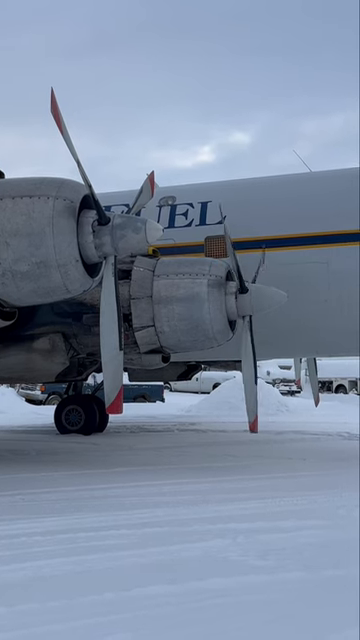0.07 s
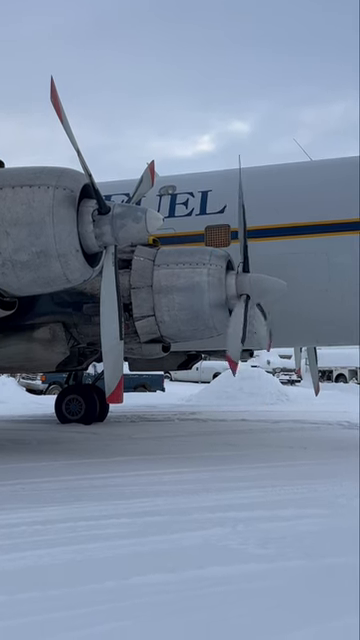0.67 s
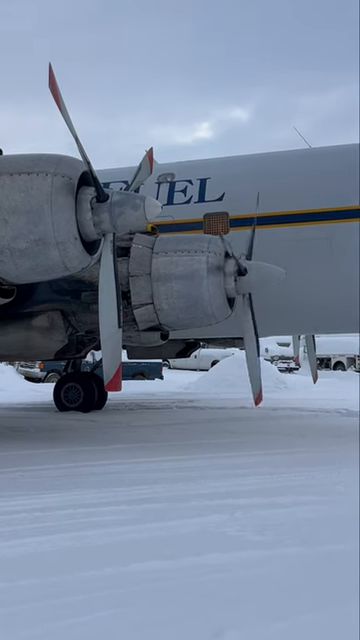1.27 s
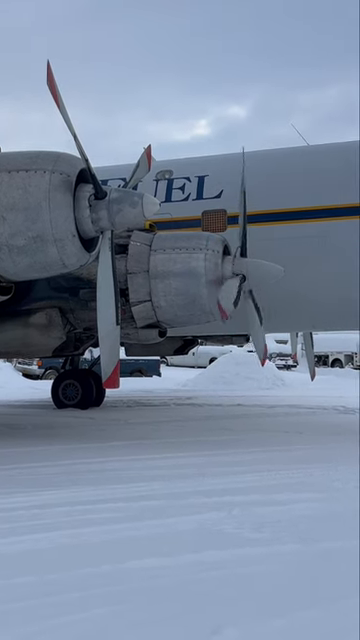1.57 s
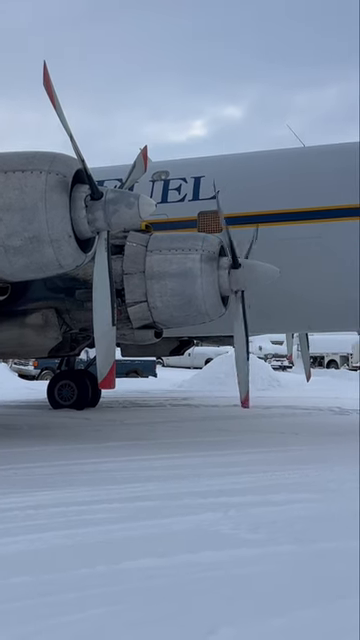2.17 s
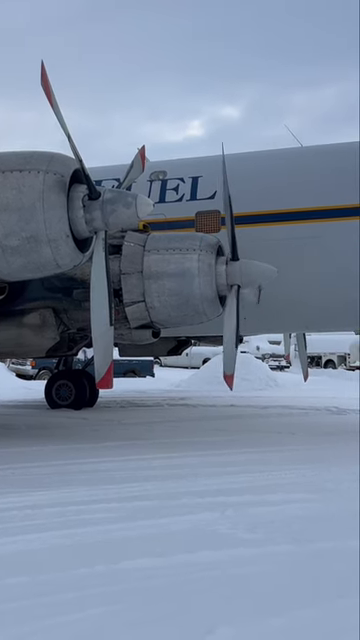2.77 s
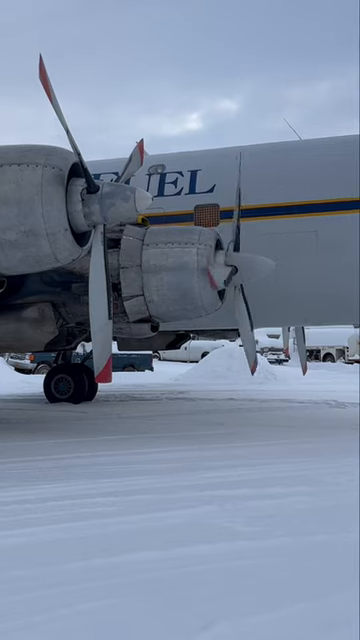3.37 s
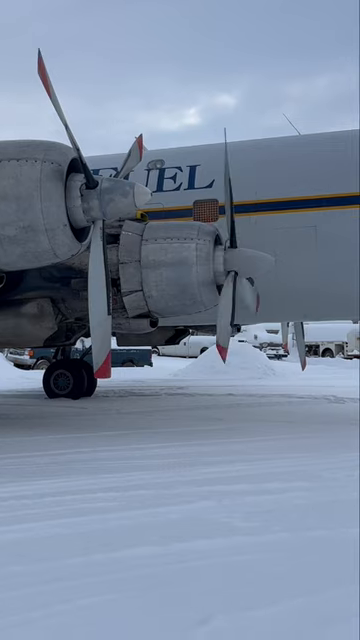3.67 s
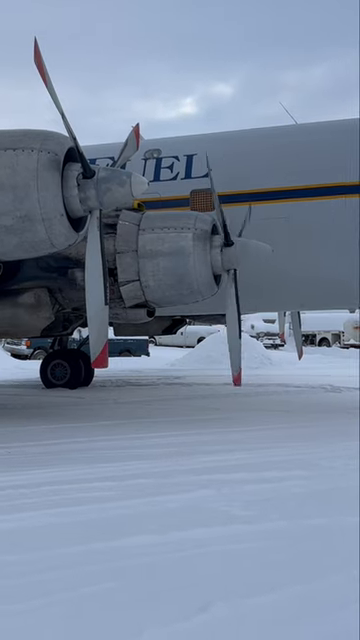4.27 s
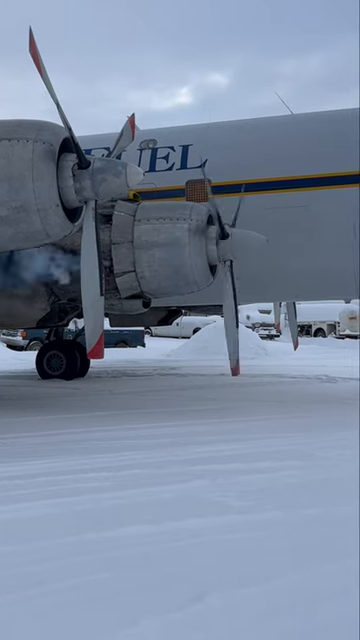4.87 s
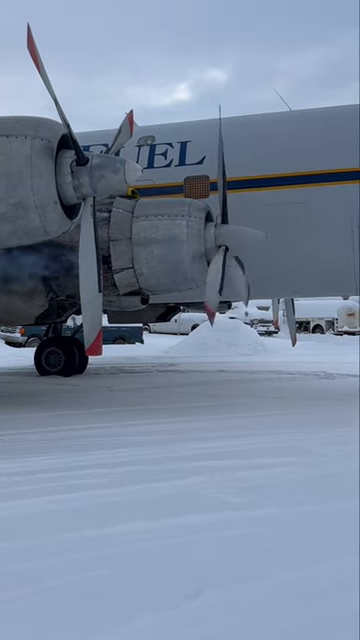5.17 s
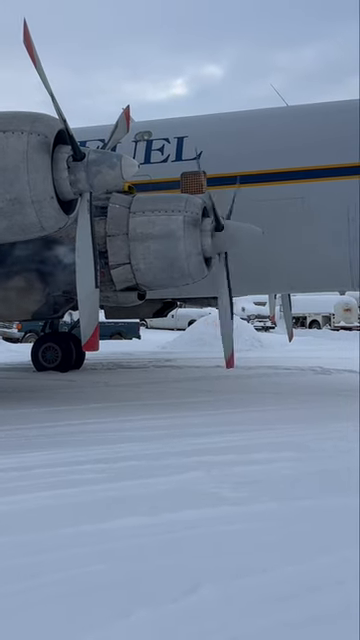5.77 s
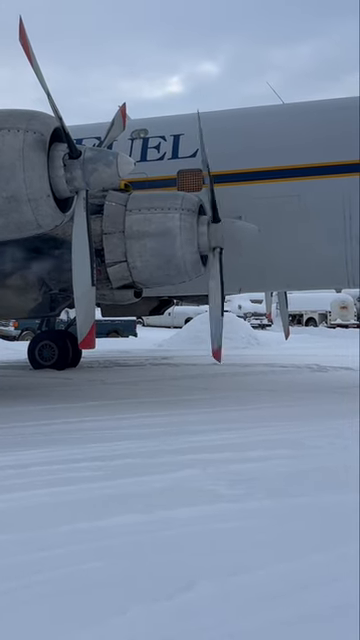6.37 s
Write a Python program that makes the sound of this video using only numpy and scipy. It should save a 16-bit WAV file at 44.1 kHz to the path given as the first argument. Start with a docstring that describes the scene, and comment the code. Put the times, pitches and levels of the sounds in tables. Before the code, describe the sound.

From beside the wing on an open airfield, loose gears clank softly and a starter sings faintly while a big propeller engine turns over. Scattered pops and coughs build into a short, loud run of cracking, booming exhaust bangs. Afterwards the engine rumbles and clatters, gradually slowing, with a sinking whine and a few knocks. The sound sits slightly to one side, with a short echo and faint hiss.

```python
"""Slack gears clank and a starter sings thinly as a big radial aircraft engine is cranked on a snowy apron.
Single cylinders cough into the exhaust stacks, then a volley of bangs spins the shaft up.
The engine coasts on: exhaust strokes rumble in the pipes, valves clatter, the gear whine falls.
Heard in stereo from the ground beside the wing, with a short echo off the airframe and a faint hiss."""
import sys
import numpy as np
from scipy import signal
from scipy.fft import rfft, irfft, next_fast_len
from scipy.io import wavfile
from scipy.ndimage import map_coordinates

SR = 44100
rng = np.random.default_rng(int(sys.argv[2]) if len(sys.argv) > 2 else 0)


def dump(signal):
    """Clip the signal to [-1, 1] and save it as 16-bit WAV at the path in sys.argv[1]."""
    limited = np.clip(np.atleast_2d(signal).T, -1, 1)
    pcm = np.round(limited * 32767).astype(np.int16)
    wavfile.write(sys.argv[1], SR, pcm)


N = 292383

# cylinders firing into the stacks:
# (time [s], crack [dB], bark [dB], blast [dB], boom [dB], stack resonance [Hz], rise [s])
FIRINGS = [(2.529, -40.5, -48, -42.5, -46.5, 2980, 0.0088),
           (2.545, -32.5, -35.5, -32.5, -35.5, 2070, 0.007), (3.092, -72, -36, -30.5, -26.5, 3900, 0.021),
           (3.227, -55.5, -37.5, -35, -24.5, 2486, 0.011), (3.654, -82, -35, -32.5, -34.5, 3860, 0.019),
           (3.856, -51, -55, -43.5, -39, 5370, 0.0094), (3.884, -30.5, -27, -28.5, -23, 2420, 0.014),
           (4.016, -44, -40, -40, -42, 2860, 0.011), (4.043, -32.5, -40, -39.5, -38, 2620, 0.015),
           (4.153, -46.5, -50, -36.5, -44, 2820, 0.0085), (4.175, -30.5, -34, -57, -32, 2420, 0.014),
           (4.272, -11, -29.5, -36, -48, 4000, 0.015), (4.329, -27, -40.5, -30, -38, 2670, 0.012),
           (4.401, -23.5, -30.5, -26, -17.5, 1660, 0.016), (4.467, -15.5, -21, -24, -16, 1671, 0.014),
           (4.541, -15, -14, -26.5, -25, 6430, 0.012), (4.587, -15, -13.5, -28, -15.5, 2050, 0.018),
           (4.622, -18.5, -14.5, -19, -22, 6300, 0.021), (4.659, -10.5, -20, -32, -34, 1590, 0.0089),
           (4.701, -15, -18.5, -20, -31, 2740, 0.011), (4.75, -13, -14.5, -37, -24, 6840, 0.012),
           (4.789, -18.5, -10.5, -20, -9.5, 1990, 0.016), (4.815, -25, -15.5, -28.5, -15, 2800, 0.011),
           (4.85, -17.5, -23, -25.5, -31, 2580, 0.011), (4.886, -13.5, -15.5, -23, -42, 2820, 0.01),
           (4.931, -14.5, -16, -24, -16, 4070, 0.01), (5.024, -16, -22, -27.5, -21, 2914, .012)]
# spectrum of gas cracking out of a stack: (frequency [Hz], level [dB])
CRACK_SPECTRUM = [(1300, -8.5), (1750, 0), (2100, 2.5), (2350, -5), (2800, 4.5), (3300, -2.5), (4000, 3),
                  (5300, -3), (6500, -2), (7500, -16), (9900, -13.5), (11900, -10), (13900, -19.5),
                  (15500, -7)]
# spectrum of the cowling's clank: (frequency [Hz], level [dB])
CLANK_SPECTRUM = [(450, -24), (620, 3), (820, 7), (1030, 7.5), (1220, -5.5), (1550, 3.5), (1950, -2),
                  (2500, -42), (3500, -26.5)]
# bright spectrum of ringing metal, and of gas leaking past a valve: (frequency [Hz], level [dB])
RING_SPECTRUM = [(1600, 5), (2500, 11), (3300, 3.5), (4300, 4), (6600, -14), (8000, -46), (12000, -42)]
# shaft speed up to the last bang, at the main gear mesh: (time [s], tooth rate [Hz])
RUN_UP = [(2.33, 198.7), (2.5, 213), (2.65, 236), (2.9, 264), (3.1, 271.5), (3.35, 300), (3.82, 321.2),
          (4.25, 542.9), (4.64, 851.4), (4.85, 985), (5.0, 1010)]
# exhaust rumble as the starter turns the engine, before speed adds to it: (time [s], level [dB])
CRANKING_RUMBLE = [(0.0, -49.5), (0.15, -46.5), (0.85, -53.5), (1.25, -72), (1.5, -50.5), (1.65, -44.5),
                   (1.799, -54.5), (2.049, -52.5), (2.25, -41.5), (2.5, -48.5)]


def bangs():
    """Burning gas tears out of a stack; the pipe barks, and its air column booms on."""
    # midrange rush of the gas: (frequency [Hz], level [dB])
    blast_spectrum = [(400, -12), (600, 1.5), (830, 6), (1030, 6.5), (1230, -9.5), (1650, -2),
                      (2100, -17.5), (4000, -41)]
    # low bark of the pipe: (frequency [Hz], level [dB])
    bark_spectrum = [(120, -1), (200, 1), (260, -6.5), (330, 0), (410, 9), (465, -2.5), (530, -21),
                     (800, -55)]
    times, crack_db, bark_db, blast_db, boom_db, stack_hz, rise = np.transpose(FIRINGS)
    crack = bursts(times - .004, crack_db, CRACK_SPECTRUM, rise, t60=0.078, ripple_db=6.5,
                   ripple_hz=147.75, stretch=0.62, tail_db=-13.5, tail_t60=0.15,
                   peak_hz=stack_hz, peak_db=12)
    blast = bursts(times - .004, blast_db, blast_spectrum, rise, t60=0.2,
                   ripple_db=7.5, ripple_hz=81, stretch=0.27, peak_hz=857, peak_db=3.5)
    bark = bursts(times - .003, bark_db, bark_spectrum, rise=0.006, t60=0.11,
                  ripple_db=3, ripple_hz=40.3, stretch=1)
    t, boom = np.arange(SR // 2) / SR, np.zeros(N + SR)
    for start, db, hard in zip(times, boom_db, crack_db > -30):
        # a hard bang booms lower and shorter than a cough
        hz, spread, t60 = (66, .3, 0.3) if hard else (109.8, .1, 0.41)
        detune, phase = rng.random(2)
        hz *= 1 + spread * (detune - .5)
        column = np.sin(2 * np.pi * (hz * t + phase))
        boom[round(start * SR):][:len(t)] += amp(db) * column * swell(t, rise=0.032, t60=t60)
    # gas hisses past the opening valve just ahead of each bang
    leak = bursts(times - .02, blast_db - 16, RING_SPECTRUM, rise=0.029, t60=0.2,
                  ripple_db=4, ripple_hz=164, stretch=0)
    crack_flutter = unit(amp(wobble(400)))
    boom_flutter = amp(1.5 * wobble(60))
    return crack * crack_flutter + blast + leak + bark + boom[:N] * boom_flutter


def sputter():
    """Between the bangs of the volley the burning gas crackles raggedly."""
    start_s, end_s, fade_s = 4.327, 4.98, 0.15
    t = np.arange(N) / SR
    burning = np.clip(np.minimum(t - start_s, end_s - t) / fade_s, 0, 1)
    ragged = amp(11 * np.tanh(wobble(170)))
    return amp(-28) * burning * unit(ragged * noise(CRACK_SPECTRUM))


def afterburn(levels_db, life_s=0.084):
    """Envelope of the gas that each bang leaves burning in the pipes; a volley piles it up to a roar."""
    t, power = np.arange(SR) / SR, np.zeros(N + SR)
    flame = swell(t, rise=0.018, t60=np.log(1000) * life_s)
    for (start, *_), db in zip(FIRINGS, levels_db):
        power[round(start * SR):][:SR] += (amp(db) * flame) ** 2
    return np.sqrt(power[:N])


def engine():
    """Exhaust strokes throb in the pipes while the valve gear clatters at the same pace."""
    # rumble of the exhaust pipes: (frequency [Hz], level [dB])
    exhaust_spectrum = [(20, -45), (38, -12.5), (52, -9), (65, 0), (85, -10.5), (115, -4), (160, -14.5),
                        (200, -13.5), (250, -68), (400, -24.5), (900, -77)]
    # clatter of the machinery: (frequency [Hz], level [dB])
    clatter_spectrum = [(150, -19), (250, 5), (350, 13), (430, 2), (520, -5), (750, 3), (1020, 3),
                        (1220, -10), (1700, -4.5), (2600, -13), (6600, -33), (15500, -52)]
    # bright chatter of the tappets: (frequency [Hz], level [dB])
    tappet_spectrum = [(1150, -3), (1650, 3), (2800, -7), (4000, -8.5), (5600, -21), (6550, -17.5),
                       (7300, -29.5), (12000, -37.5)]
    _, crack_db, bark_db, *_ = np.transpose(FIRINGS)
    tooth_hz, speed = tooth_rate(), speed_octaves()
    stroke_hz = tooth_hz * .072
    pulses = strokes(stroke_hz, scatter_db=11.5, jitter=0.13)
    # at cranking speed the cylinders push out a smooth flow; with speed it breaks into distinct pulses
    pulsing = np.clip((tooth_hz - 300) / 700, 0, .8)
    gas = pulsing * unit(pulses) + np.sqrt(1 - pulsing ** 2) * rng.standard_normal(N)
    coasting = np.clip((np.arange(N) / SR - RUN_UP[-1][0]) / 1.86, 0, 1)
    rumble_db = curve(CRANKING_RUMBLE) + 7.5 * speed + 0.5 * coasting
    rumble_gain = np.hypot(amp(rumble_db), amp(-9) * afterburn(bark_db))
    rumble = rumble_gain * coloured(gas, exhaust_spectrum)
    valves = puffs(strokes(stroke_hz, scatter_db=14.5, jitter=0.23), decay_s=0.0023)
    clatter = coloured((1 + 0.16 * pulsing * valves) * rng.standard_normal(N), clatter_spectrum)
    clatter_gain = np.hypot(amp(clatter_db()), amp(-22) * afterburn(crack_db))
    tappets = coloured((1 + 0.37 * valves) * rng.standard_normal(N), tappet_spectrum)
    tappet_gain = amp(-38.5 + 12 * (speed - speed.max()))
    return rumble + clatter_gain * clatter + tappet_gain * tappets


def strokes(rate_hz, scatter_db, jitter):
    """One impulse per cylinder stroke; each of the 18 cylinders has its own strength."""
    at = np.flatnonzero(np.diff(np.floor(np.cumsum(rate_hz) / SR)))
    cylinder = np.resize(rng.standard_normal(18), len(at))
    chance, slip = rng.standard_normal((len(at), 2)).T
    strength = amp(scatter_db * np.tanh(.5 * (cylinder + chance))) / np.sqrt(rate_hz[at])
    slipped = np.clip(at + jitter * slip * SR / rate_hz[at], 0, N - 1).astype(int)
    return np.bincount(slipped, strength, N)


def gear_whine():
    """Meshes whine, smeared by uneven teeth; each swells as it glides through a cowling resonance."""
    # gear meshes: (multiple of the tooth rate, level at top speed on resonance [dB], roughness,
    # cowling resonance [Hz], its width [Hz])
    meshes = [(.5, -31.5, .7, 385, 110), (1, -28.5, 1, 930, 100), (1, -36.5, 1, 790, 60),
              (1.5, -32.5, 1.6, 990, 70), (2, -40.5, 2, 1600, 200)]
    phase = 2 * np.pi * np.cumsum(tooth_rate() * (1 + 0.01317 * wobble(35))) / SR
    whine, speed = np.zeros(N), speed_octaves()
    for ratio, db, rough, cowling_hz, width_hz in meshes:
        mesh = rough_tone(ratio * phase, rough, rate=110)
        resonant = filtered(mesh, lambda hz: 1 / (1 + 2j * (hz - cowling_hz) / width_hz))
        whine += amp(db + 1.5 * wobble(13)) * resonant
    # the teeth float as the load reverses and the propeller starts to drive the engine
    float_db = -11.5 * np.exp(-((np.arange(N) / SR - 5.08) / 0.11) ** 2)
    return whine * amp(10.5 * (speed - speed.max()) + float_db)


def knocks():
    """Gear backlash rattles the cowling at each compression; the slack parts rebound and strike again."""
    # slack gears and valve gear knocking: (time [s], clank [dB], ring [dB], panel resonance [Hz])
    strikes = [(0.058, -47, -64, 933), (0.247, -40.5, -50.5, 930), (0.712, -47, -62, 902),
               (0.808, -45, -69, 1020), (1.126, -47, -55, 1030), (1.377, -46, -55, 1040),
               (1.45, -50, -53.5, 1490), (1.485, -64, -64, 1710), (1.601, -42.5, -45, 1080),
               (1.673, -41.5, -47, 743), (1.938, -42.5, -48, 1150), (2.081, -47.5, -58, 830),
               (2.372, -48, -71, 1610), (2.635, -41, -51, 673), (2.76, -42, -58, 950),
               (2.917, -39, -51.5, 816), (3.444, -49.5, -66, 1520), (3.752, -46, -55, 910),
               (5.645, -35, -50, 890), (6.05, -33, -45, 780), (6.185, -34, -54, 1050),
               (6.262, -33, -55, 1400), (6.577, -30.5, -48, 990)]
    # thud under each clank: (frequency [Hz], level [dB])
    thud_spectrum = [(130, 17), (200, -6.5), (350, 6.5), (700, -15), (1100, -41)]
    times, clank_db, ring_db, panel_hz = np.transpose(strikes)
    rebounds = times + 0.013 * amp(rng.standard_normal(len(times)))
    metal = np.zeros(N)
    for at, loss_db in ((times, 0), (rebounds, -9)):
        metal += bursts(at, clank_db + loss_db, CLANK_SPECTRUM, rise=0.0033, t60=0.16,
                        ripple_db=9.5, ripple_hz=88.8, stretch=0.16, peak_hz=panel_hz, peak_db=11.5)
        metal += bursts(at, ring_db + loss_db, RING_SPECTRUM, rise=0.0045, t60=0.096,
                        ripple_db=5, ripple_hz=164, stretch=0.15, peak_hz=3250, peak_db=8)
    lull_db = np.minimum(rumble_swing_db()[(times * SR).astype(int)], 0)
    thud = bursts(times, clank_db - 2.5 + lull_db, thud_spectrum, rise=0.0065, t60=0.29,
                  ripple_db=-3.5, ripple_hz=38, stretch=0.17)
    return metal + thud


def rattle(teeth_per_knock=30):
    """Small loose knocks; as the shaft speeds up they come quicker and merge into the clatter."""
    at = np.flatnonzero(np.diff(np.floor(np.cumsum(tooth_rate()) / SR / teeth_per_knock)))
    slip, size = rng.standard_normal((len(at), 2)).T
    times = np.clip(at / SR + .03 * slip, 0, N / SR)
    usual_db = clatter_db() - 2 - 2 * speed_octaves()
    db = usual_db[at] + 3 * np.tanh(size)
    clank = bursts(times, db, CLANK_SPECTRUM, rise=0.011, t60=0.14,
                   ripple_db=-1, ripple_hz=87.3, stretch=0.2)
    ring = bursts(times, db - 11.5, RING_SPECTRUM, rise=0.0066, t60=0.11,
                  ripple_db=4.5, ripple_hz=163, stretch=0.2)
    return clank + ring


def plops():
    """Two small plops sweep down from a click to a low knock."""
    # plops early in the cranking: (time [s], level [dB], time constant of the falling pitch [s])
    sweeps = [(0.094, -38.5, 0.0089), (0.831, -36.5, 0.0038)]
    t, out = np.arange(SR // 8) / SR, np.zeros(N)
    for start, db, fall_s in sweeps:
        hz = 110 + 900 * np.exp(-t / fall_s)
        sweep = np.sin(2 * np.pi * np.cumsum(hz) / SR)
        out[round(start * SR):][:len(t)] += amp(db) * sweep * swell(t, rise=0.0027, t60=9 * fall_s)
    return out


def moan(start_s=2.185, length_s=0.096):
    """Air squeezed through an open valve moans briefly in a stack; pitch and level arch together."""
    arch = np.sin(np.pi * np.clip((np.arange(N) / SR - start_s) / length_s, 0, 1))
    hz = (106.7 + 25.5 * arch) * (1 + 0.036 * wobble(80))
    phase = 2 * np.pi * np.cumsum(hz) / SR
    return amp(-44) * arch * (np.sin(phase) + 1.5 * np.sin(2 * phase) + .4 * np.sin(3 * phase))


def starter(cranking_hz=3875, housing_hz=5500, off_s=4.0):
    """The starter sings thinly, muffled by its housing as it races; it drops out as the engine catches."""
    # partials of the starter motor: (multiple of its pitch, level [dB], roughness)
    partials = [(.76, -5, 1.6), (1, 0, .55)]
    speed = speed_octaves()
    phase = 2 * np.pi * np.cumsum(cranking_hz * 2 ** speed * (1 + .004 * wobble(9))) / SR
    song = sum(amp(db) * rough_tone(ratio * phase, rough, rate=70) for ratio, db, rough in partials)
    wavering = unit(song * amp(2 * wobble(14)))
    engaged = np.clip((off_s - np.arange(N) / SR) * 10, 0, 1)
    motor = amp(-71 - 4 * speed) * engaged * wavering
    return filtered(motor, lambda hz: 1 / (1 + (hz / housing_hz) ** 20))


def microphone(source):
    """Direct sound from a little to one side reaches the two ports with unequal level and phase."""
    # left port's level over the right's: (frequency [Hz], level [dB])
    tilt = [(110, 0), (330, -1.8), (1300, -1.3), (2400, -6.5), (4400, -11), (6400, 6), (8000, -1)]
    # left port's lead over the right: (frequency [Hz], phase [rad])
    lead = [(100, 0.007), (550, 0.38), (1100, 0.4), (2100, 0.86), (3500, 2.3), (4300, 3.6), (5700, 5.75),
            (6500, 5.9), (9000, 9.15), (12000, 14.33), (15500, 17.2)]

    def port(hz, share):
        return amp(share * along(tilt, hz)) * np.exp(1j * share * along(lead, hz))

    return filtered(source, lambda hz: np.array([port(hz, 0.5), port(hz, -0.375)]))


def airframe_echo(source):
    """Wing, hull and ground scatter a short echo to each port; the turning blades keep changing its paths."""
    echo_levels = [(60, -30), (400, -19), (1200, -13), (3000, -8)]  # (frequency [Hz], level [dB])
    t = np.arange(SR // 5) / SR
    scatter = rng.standard_normal((2, 2, len(t))) * swell(t, rise=0.0044, t60=0.029)
    paths = unit(scatter) / np.sqrt(len(t))
    one, other = signal.fftconvolve(source[None, None], paths, axes=2)[..., :N]
    blade_angle = 2 * np.pi * np.cumsum(tooth_rate() * 0.00299) / SR
    echo = np.cos(blade_angle) * one + np.sin(blade_angle) * other
    return filtered(echo, lambda hz: amp(along(echo_levels, hz)))


def apron_hiss():
    """Faint hiss of the open apron, partly common to both ports, mostly separate."""
    # background of the apron: (frequency [Hz], level [dB])
    spectrum = [(60, 4.5), (200, -7), (350, -23), (540, -3), (880, 4.5), (1220, -6), (2750, -11),
                (4400, -13.5), (6600, -24.5), (9000, -30.5), (15000, -84)]
    return amp(-65.5) * (noise(spectrum) + 1.7 * np.array([noise(spectrum), noise(spectrum)]))


def tooth_rate(coast_s=3.85, sag_hz=2.8, sag_period_s=1.3):
    """Shaft speed in teeth a second: it sags under compression, the bangs spin it up, drag slows it."""
    t = np.arange(N) / SR
    coast = np.exp(-np.maximum(t - RUN_UP[-1][0], 0) / coast_s)
    sag = sag_hz * np.cos(2 * np.pi * (t - .57) / sag_period_s)
    return curve(RUN_UP) * coast - sag


def speed_octaves():
    """How far the shaft runs above cranking speed."""
    return np.log2(tooth_rate() / RUN_UP[0][1])


def rumble_swing_db():
    """The cranking rumble's rise and fall about its usual level."""
    return curve(CRANKING_RUMBLE) - np.median(np.transpose(CRANKING_RUMBLE)[1])


def clatter_db():
    """The machinery grows louder with speed and shares the rumble's swings."""
    return -56 + 9 * speed_octaves() + 0.57 * rumble_swing_db()


def bursts(times, levels_db, spectrum, rise, t60, ripple_db, ripple_hz, stretch,
           tail_db=-19, tail_t60=0.44, peak_hz=1000, peak_db=0):
    """Noise bursts, each with its own random resonances; stretch makes weak ones unfold more slowly."""
    t, out = np.arange(SR // 3) / SR, np.zeros(N + SR)
    hz = np.fft.rfftfreq(len(t), 1 / SR)
    colour = spectrum_gain(spectrum, hz)
    half_width_octaves = 0.066
    for start, db, rise_s, centre_hz in np.broadcast(times, levels_db, rise, peak_hz):
        white, knots = rng.standard_normal((2, len(t)))
        ripple = np.tanh(np.interp(hz / ripple_hz, np.arange(len(t)), knots))
        peak = 1 / (1 + (np.log2((hz + 1) / centre_hz) / half_width_octaves) ** 2)
        burst = unit(irfft(rfft(white) * colour * amp(ripple_db * ripple + peak_db * peak), len(t)))
        age = t / (1 + stretch * (max(levels_db) - db) / 20)
        envelope = np.hypot(swell(age, rise_s, t60), amp(tail_db) * swell(age, rise_s, tail_t60))
        out[round(start * SR):][:len(t)] += amp(db) * envelope * burst
    return out[:N]


def puffs(pulses, decay_s):
    """Each impulse opens a short puff."""
    t = np.arange(SR // 10) / SR
    return unit(signal.fftconvolve(pulses, t * np.exp(-t / decay_s))[:N])


def rough_tone(phase, rough, rate):
    """A sine of rms 1 whose level and phase are smeared at random, rate times a second."""
    return unit(np.sin(phase) * (1 + rough * wobble(rate)) + rough * wobble(rate) * np.cos(phase))


def swell(t, rise, t60):
    """An envelope that climbs to 1 in rise seconds, then falls 60 dB every t60 seconds."""
    return np.sin(np.pi / 2 * np.clip(t / rise, 0, 1)) ** 2 * amp(-60 * np.maximum(t - rise, 0) / t60)


def wobble(rate):
    """A smooth random curve, rate knots a second."""
    return map_coordinates(rng.standard_normal(int(N * rate / SR) + 4), [np.arange(N) * rate / SR])


def noise(spectrum):
    """Coloured noise of rms 1."""
    return coloured(rng.standard_normal(N), spectrum)


def coloured(x, spectrum):
    """x shaped by a spectrum, at rms 1."""
    return unit(filtered(x, lambda hz: spectrum_gain(spectrum, hz)))


def spectrum_gain(spectrum, hz):
    """Gain of a spectrum that falls away beyond its ends."""
    low_hz, high_hz = spectrum[0][0] / 2, spectrum[-1][0] * 2
    return amp(along(spectrum, hz)) / (1 + (hz / high_hz) ** 4) / (1 + (low_hz / (hz + 1)) ** 4)


def filtered(x, response):
    """x times a complex response of frequency."""
    size = next_fast_len(N + SR // 2)
    return irfft(rfft(x, size) * response(np.fft.rfftfreq(size, 1 / SR)), size)[..., :N]


def along(points, hz):
    """(frequency [Hz], value) points read on a log axis."""
    knots_hz, values = np.transpose(points)
    return np.interp(np.log(hz + 1), np.log(knots_hz + 1), values)


def curve(points):
    """(time [s], value) points read at every sample."""
    return np.interp(np.arange(N) / SR, *np.transpose(points))


def amp(db):
    """Decibels to gain."""
    return 10 ** (np.asarray(db) / 20)


def unit(x):
    """Scale to rms 1."""
    return x / np.sqrt(np.mean(x ** 2) + 1e-20)


def scene():
    """From the ground beside the wing: the engine a little to one side, its echo, the apron behind."""
    source = bangs() + sputter() + knocks() + rattle() + plops() + moan()
    source += engine() + gear_whine() + starter()
    return microphone(source) + apron_hiss() + airframe_echo(source)


def record(dry, ceiling=.9, top_hz=16100):
    """The recorder rounds off the highest peaks and keeps nothing above its band limit."""
    rounded = dry / (1 + (dry / ceiling) ** 6) ** (1 / 6)
    return filtered(rounded, lambda hz: 1 / np.sqrt(1 + (hz / top_hz) ** 200))


dry = scene()
out = record(dry)
dump(out)
```